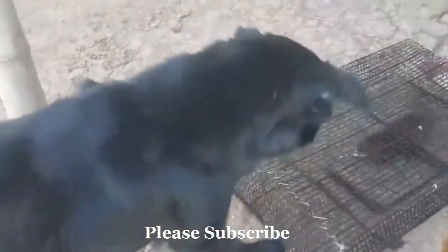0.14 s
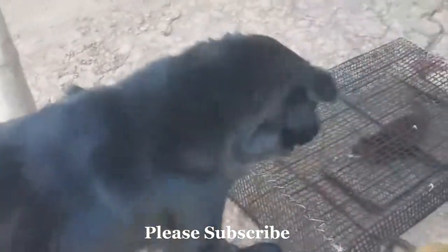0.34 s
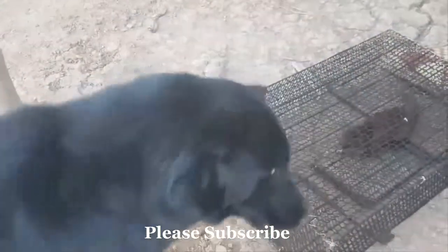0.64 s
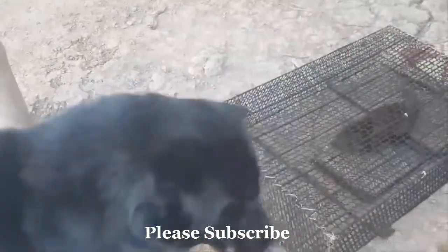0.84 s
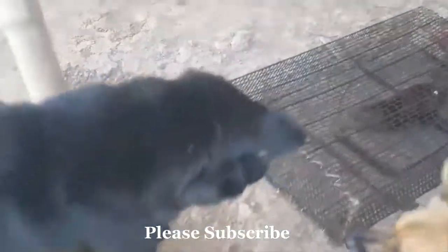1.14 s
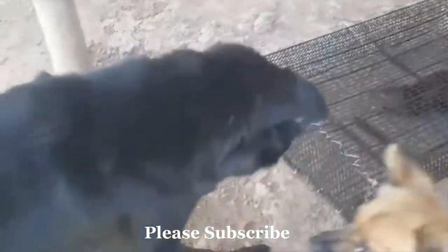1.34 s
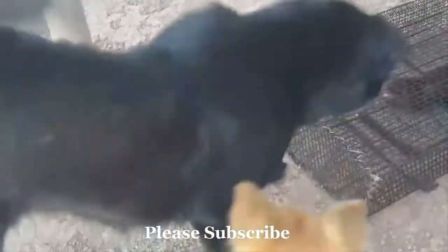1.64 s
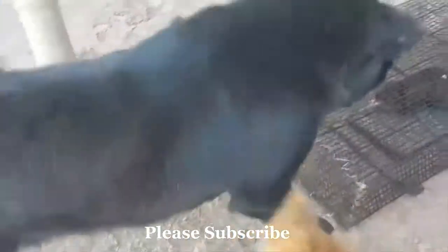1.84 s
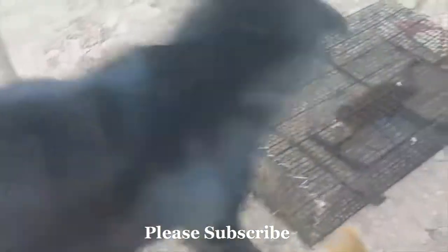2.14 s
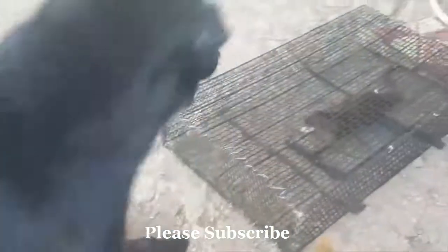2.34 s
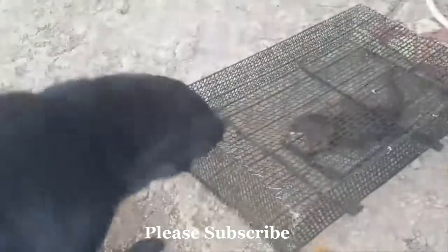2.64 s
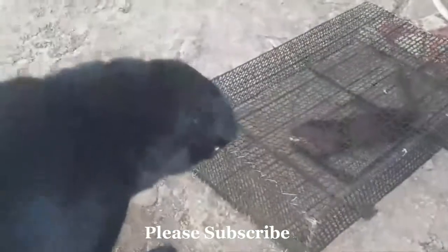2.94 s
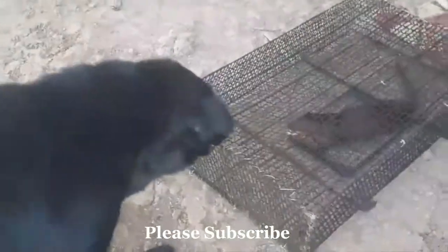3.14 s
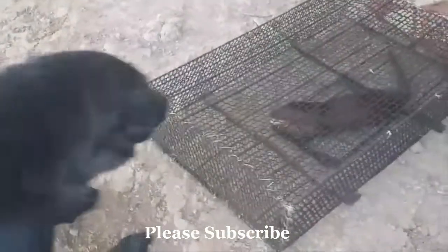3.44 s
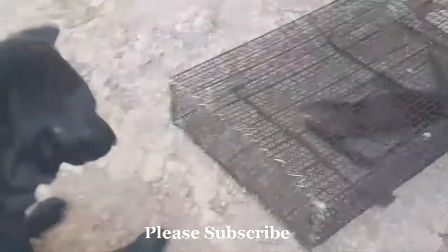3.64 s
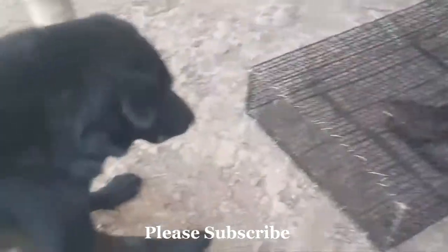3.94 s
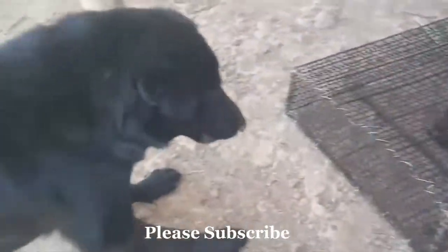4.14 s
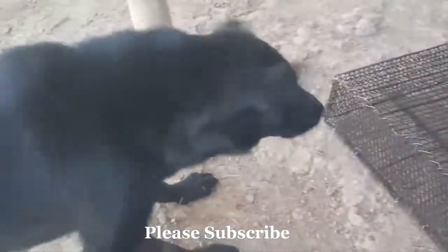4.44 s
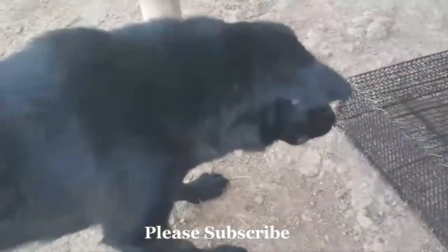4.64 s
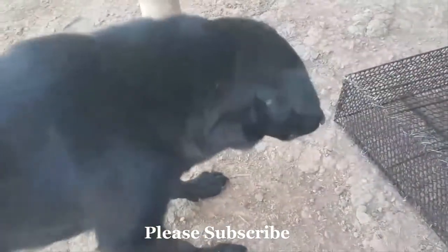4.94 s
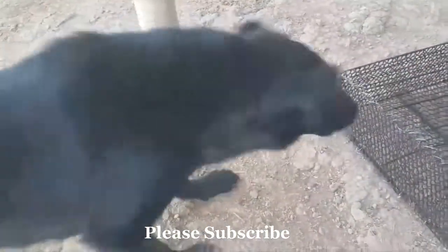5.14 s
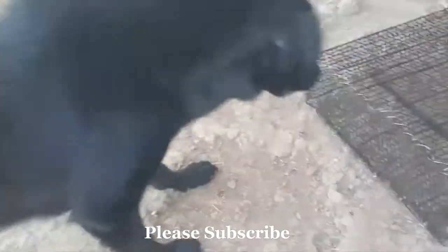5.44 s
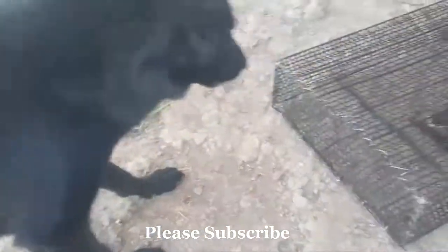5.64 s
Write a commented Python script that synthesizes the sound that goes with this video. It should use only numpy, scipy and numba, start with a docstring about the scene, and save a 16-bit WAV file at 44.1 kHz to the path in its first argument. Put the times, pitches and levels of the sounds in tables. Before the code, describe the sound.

Close, rough, overloading barks from a big dog in a hard yard, with low breathy growls, a few short whines and faint wind.

```python
"""A hard-floored yard with a wire cage: a large dog growls and barks close to a small stereo microphone.
A second dog whines and yelps beside it, over wind rumble, faint air noise and small ticks.
Barks and growls are uneven pulses and puffs of noise through resonances; whines are stacks of sine waves.
Decaying noise makes the reflections. Crackles at set times give the sound of an overloaded input."""
import sys
import numpy as np
from scipy import signal
from scipy.fft import rfft, irfft
from scipy.io import wavfile
from scipy.ndimage import uniform_filter1d, minimum_filter1d
from numba import njit

SR = 44100
rng = np.random.default_rng(int(sys.argv[2]) if len(sys.argv) > 2 else 0)


def log_audio(samples):
    """Write samples as a 16-bit WAV file to the path given in sys.argv[1]."""
    # one column per channel
    frames = np.atleast_2d(samples).T
    # limit to full scale, then quantise
    limited = np.clip(frames, -1, 1)
    pcm = np.round(limited * 32767).astype(np.int16)
    wavfile.write(sys.argv[1], SR, pcm)


N = 255735

# Barks (the first begins before the sound starts): start t/s, attack/s, voiced length/s,
# pitch at start f/Hz, at top f/Hz, at end f/Hz, throat level/dB, mouth level/dB, lips level/dB,
# rasp level/dB, release/(dB per s), tail below the voice level/dB
BARKS = [ (-0.17, .012, 0.15, 592, 680, 604.6, -16.5, -12.5, -26.5, -39, 657, 15.5),
         (0.451, 0.0064, 0.11, 596.1, 677.5, 660.2, -10, -17.5, -31, -33, 650, 9.5),
         (1.46, 0.016, 0.11, 681, 761.2, 639.4, -9.5, -12, -26.5, -32.5, 505, 18),
         (2.182, 0.014, 0.11, 561.4, 706.5, 666.1, -11.5, -19, -31, -37, 797.5, 22.5),
         (2.363, 0.031, 0.16, 585.9, 668.1, 541, -11.5, -14.5, -33, -36.5, 455, 27.5),
         (3.413, 0.0074, 0.12, 480, 701.3, 688.9, -14.5, -9.5, -24, -29.5, 654, 14),
         (4.338, .013, 0.13, 618.3, 715.4, 634, -10, -10, -26.5, -28.5, 653, 31),
         (5.06, 0.024, 0.13, 416.7, 797.5, 597.8, -20.5, -13, -23, -33, 702, 25), ]
# Jaw during each bark: t/s, mouth f/Hz, lips f/Hz, level moved from throat to mouth/dB
JAW = [
    [(0, 950, 1500, -2), (.1, 920, 1560, 2.5)],
    [(.458, 836, 1460, -1.5), (.48, 860, 1884, 4.5), (.51, 1100, 1760, -5), (.54, 1110, 1560, 2.5),
     (.565, 1030, 1660, 2), (.585, 910, 1640, -7), (.62, 994, 1550, 6)],
    [(1.47, 906, 1830, 6.5), (1.487, 1080, 1930, -3.5), (1.515, 1027, 1680, 1.5), (1.56, 940, 1775, 9),
     (1.585, 970, 1490, 2), (1.615, 1074, 1629, -7)],
    [(2.195, 1100, 1770, 4.5), (2.22, 836, 1420, -3.5), (2.25, 1086, 1470, 1.5), (2.28, 1060, 1440, -8),
     (2.3, 1130, 1710, 3)],
    [(2.385, 1060, 1564, -5.5), (2.42, 960, 1670, 2), (2.455, 1044, 1890, -6), (2.49, 900, 1530, 2),
     (2.52, 1026, 1590, -3), (2.54, 940, 1700, 6.5), (2.56, 1010, 1540, -1)],
    [(3.422, 1060, 1580, -4.5), (3.44, 1077, 1679, 7.5), (3.47, 975, 1663, -0.5), (3.5, 967, 1590, 1.5),
     (3.525, 1020, 1940, 0.5), (3.55, 1005, 1509, -8.5), (3.58, 924, 1665, 0)],
    [(4.35, 994, 1700, -3.5), (4.375, 841.7, 1735, 5), (4.4, 845, 1923, -9), (4.425, 936, 1800, 0),
     (4.455, 1043, 1740, -4), (4.48, 880, 1740, -2), (4.505, 983, 1714, 13)],
    [(5.075, 1092, 1772, -1.5), (5.09, 1176, 1802, -7), (5.102, 974, 1850, 2.5), (5.15, 912, 1694, 6),
     (5.168, 1254, 1820, -8), (5.2, 967, 1700, 6), (5.225, 1160, 1704, -5.5)],
]
# Resonances of the bark's rasp: f/Hz, width/Hz (before formant() widens it), relative level/dB
RASP = [(1310, 320, 12), (2160, 250, 13), (2904, 420, 3.5), (3950, 380, -21), (4626, 760, -10.5),
        (6900, 670, -22), (12500, 4800, -30)]
# Growl and rough breath, one list per breath: t/s, throat and mouth level/dB, chest level/dB, treble level/dB
GROWL = [
    [(0.12, -52.5, -64, -65), (0.162, -56.5, -60, -57.5), (0.254, -46.5, -44, -56.5),
     (0.292, -46, -76, -55), (0.322, -45.5, -53.5, -52.5), (0.372, -41, -77, -54),
     (0.41, -43.5, -55.5, -64)],
    [(0.72, -63.5, -85, -81), (0.77, -69, -101, -84), (0.936, -55, -50, -60), (1.004, -58, -76, -66.5),
     (1.068, -54.5, -55.5, -71), (1.372, -30.5, -39, -43.5), (1.445, -69, -42.5, -61)],
    [(1.69, -53, -54.5, -60.5), (1.77, -55, -45, -58), (1.806, -42.5, -41.5, -54.5),
     (1.986, -47.5, -40.5, -57.5), (1.994, -44, -34.5, -53), (2.07, -41, -42.5, -55.5),
     (2.175, -47, -44, -42.5)],
    [(2.75, -62, -67, -72.5), (2.776, -50.5, -44, -58.5), (2.89, -39, -35.5, -54.5),
     (3.076, -35.5, -35, -51.5), (3.106, -46, -37.5, -57), (3.372, -37, -33.5, -40.5),
     (3.402, -60, -44, -51)],
    [(3.72, -85.5, -61, -82.5), (3.77, -86, -75, -82), (3.784, -101.5, -85, -81), (3.824, -74, -62, -87),
     (3.878, -67.5, -61, -79), (3.924, -63.5, -50.5, -59), (3.955, -68, -67.5, -82)],
    [(3.985, -58, -59, -74), (4.013, -65, -61.5, -81.5), (4.167, -61.5, -65, -59.5),
     (4.251, -47.5, -44, -55), (4.275, -45.5, -54.5, -56), (4.309, -74, -57, -68),
     (4.325, -58.5, -53, -75.5)],
    [(4.655, -59, -63.5, -84), (4.679, -47, -49, -64), (4.777, -44.5, -40, -59.5),
     (4.877, -57, -59.5, -55.5), (5.009, -53, -66.5, -56.5), (5.029, -72.5, -74, -65.5),
     (5.04, -76.5, -44.5, -66)],
    [(5.36, -60, -86, -89.5), (5.38, -47, -47.5, -67), (5.43, -47, -42, -66), (5.5, -55, -51.5, -64),
     (5.586, -51.5, -47.5, -61.5), (5.73, -55.5, -50, -63.5), (5.79, -43, -47, -54)],
]
# Colour of each breath: mouth against throat level/dB, teeth against treble level/dB,
# hiss against treble level/dB, stretch of the teeth resonances (a factor)
BREATHS = [(-6.5, -4, -13, 0.93), (-12, -4, -11.5, 0.93), (-9, -7, -11.5, 0.93), (-1, -6.5, -11.5, 0.957),
           (-5, -2.5, -11.5, 0.64), (-7, -4, -11, 0.9), (-6, -3.5, -10, 0.9), (-4, -1.5, -7.5, 0.915)]
# Resonances of the growl, before the jaw shifts them:
# f/Hz, width/Hz (before formant() widens it), relative level/dB
CHEST = [(126, 37, 8.5), (214, 139, 3)]
THROAT = [(690, 140, 0), (950, 110, -6)]
MOUTH = [(1330, 190, 0), (1620, 150, -10)]
TEETH = [(2220, 190, 0), (2560, 220, -2)]
HISS = [(3090, 600, 20.6), (4570, 1600, 3.1), (6450, 1300, 3.5), (12400, 1900, 0.5)]
# Air moving over the microphone ports: t/s, level/dB
WIND = [(0.0, -69), (0.35, -54.5), (0.76, -68.5), (1.08, -68), (1.31, -56), (1.6, -63), (2.07, -62.5),
        (2.7, -61.5), (3.2, -52), (3.33, -51.5), (3.65, -67.5), (3.91, -63), (4.34, -63.5), (4.52, -68),
        (4.73, -81), (4.89, -57), (5.25, -76.5), (5.8, -63)]
# Tone of the yard's background noise: f/Hz, relative level/dB (per Hz)
AIR_TONE = [(18, -39), (30, -14), (109, 9.5), (350, -7.5), (955, -7.5), (1580, -16), (2150, -12),
            (9000, -42.5), (11700, -78.5), (19800, -120)]
# Second dog: loudest t/s, rise/s, fall/s, pitch at start f/Hz, just after the loudest f/Hz, at end f/Hz,
# peak level/dB (rms), partial 2 against 1 level/dB, partial 3 against 1 level/dB, hoarseness/(0-1)
WHINES = [ (0.29, .04, 0.057, 382.5, 438, 461, -39.5, -19.5, -10.5, .1),
          (2.04, 0.026, 0.083, 521, 500.5, 496, -34.5, -10.5, -22, .1),
          (2.125, 0.056, .16, 668, 541, 567, -34, -13.5, -32, .1),
          (2.625, 0.028, 0.04, 539.4, 607, 586, -17, 0.5, -17.5, .25), ]
# Small mouth and paw noises: t/s, starting level of the ring/dB, f/Hz
TICKS = [(0.416, -43.5, 710), (0.828, -47, 676), (2.137, -33, 584), (3.967, -51.5, 799.8)]
# Overload crackles: t/s, level/dB (scales the whole bump), left minus right level/dB, half-length/ms
CRACKLES = [(0.497, -18.5, -17, 0.39), (0.5, -16, 11.5, 0.075), (0.5043, -20, 18, 0.39),
            (1.4949, -35, -1, 0.11), (1.5283, -35, -4, 0.15), (3.4714, -19.5, -2, 0.13),
            (3.4917, -9.5, 1, 0.14), (3.4943, -10.5, -6, 0.28), (3.5016, -16.5, 3.5, 0.13),
            (4.374, -22, 12.5, 0.13), (4.403, -20, 14, 0.34), (4.4208, 6, -8, 0.093),
            (4.4291, -5, 7.5, 0.11), (4.4375, 3, 13, 0.16), (4.4403, 7, 0, 0.12), (4.4436, -11, -27, 0.076),
            (4.4564, -25, 4.5, 0.15)]

# Barks
CLEAR_S, ROUGHNESS = .018, .7   # roughness (0-1) builds up around this time
SOFT_CLOSURE_HZ = (320, 950)   # the open mouth sheds little bass, the folds close softly
ATTACK_DB, BRIGHT_S, BRIGHT_LAG_DB = 23.5, 0.01, 4.5   # rise of the attack; rasp and lips come up later
RISE_S, SAG_SHARE = .03, 0.65   # pitch nears its top in this time and sags after this share of the length
TAIL_DB_PER_S = 232.5   # the voice stops fast, a faint tail lingers
FLUTTER_DB, JAW_WANDER = 3.5, 0.045   # each resonance swells and drifts on its own
LIPS_FOLLOW = .6   # share of the jaw's level shift at the lips
RASP_ARCH_DB, RASP_FADE = 8.5, 0.53   # rasp is strongest mid-bark and fades at this share of the voice's rate
MOUTH_FADE = 0.11   # the mouth closes: its ring dies this share faster than the throat
# Growl and wind
GROWL_PULSES_PER_S = 105   # before the random unevenness
CHEST_ON_PORTS_DB = -18.5   # the growl also blows on the microphone ports: against the chest level
RUMBLE_HZ = 102   # top of the wind rumble
PUFF_DB, PUFF_S = -27, 0.015   # each bark puffs air on the ports: against the mouth level, decay
AIR_DB = -60
# Whines
WHINE_WAVER, WHINE_FLUTTER_DB = .012, 2.5
WHINE_EDGE_DB, WHINE_ONSET = 15, 1.6   # level lost after one rise or fall time; abruptness of the start
PARTIAL_4_DB, PARTIAL_5_DB = -3.5, -11   # against partial 3
OVERTONE_FADE = 0.21   # each higher partial dies this share faster
# Reflections: time to fall 60 dB, level before the bass is cut, bass cut
NEAR_T60_S, NEAR_DB, NEAR_LOW_HZ = 0.12, 3.5, 2000   # ground and cage, which scatter mostly treble
YARD_T60_S, YARD_DB, YARD_LOW_HZ = 0.18, -8.5, 363
NEAR_UNSHARED, YARD_UNSHARED = 0.85, 0.41   # how strongly the two sides differ
# Microphone
CRACKLE_HZ, CRACKLE_PUSH = 5004, 0.79   # wave inside a crackle; one-sided push added to it
PEAK_LIMIT, CUTOFF_HZ = .93, 15600


def from_db(db):
    """dB to gain."""
    return 10 ** (np.asarray(db) / 20)


def in_time(tables, column):
    """One column of several tables, joined by straight lines between its points."""
    rows = np.concatenate(tables)
    return np.interp(np.arange(N) / SR, rows[:, 0], rows[:, column])


def evened(x, window_s):
    """Divides out the slow level, so that the local rms is about 1."""
    power = uniform_filter1d(x ** 2, size=int(window_s * SR)).clip(0)
    return x / np.sqrt(power + 1e-12)


def wander(length):
    """Noise averaged over some samples; spread 1."""
    return uniform_filter1d(rng.standard_normal(N), size=length) * np.sqrt(length)


def slow(length):
    """Smoother random drift; spread about 1."""
    return uniform_filter1d(wander(length=length), size=length // 2)


@njit
def resonate(x, hz, r, step):
    """Two-pole resonance whose centre may move every sample."""
    y = np.zeros(len(x))
    for i in range(2, len(x)):
        push = (1 - r * r) / 2 * (x[i] - x[i - 2])
        y[i] = push + 2 * r * np.cos(step * hz[i]) * y[i - 1] - r * r * y[i - 2]
    return y


def formant(x, hz, width_hz):
    """A resonance applied twice keeps the valleys beside it dark."""
    r = np.exp(-np.pi * 1.5 * width_hz / SR)   # each pass is 1.5 times as wide
    centre = hz + np.zeros(N)
    step = 2 * np.pi / SR
    return resonate(resonate(x, centre, r, step), centre, r, step)


def formants(x, modes, shift=1):
    """Side-by-side resonances with alternating signs; shift scales their frequencies."""
    out = np.zeros(N)
    for k, (hz, width_hz, db) in enumerate(modes):
        out += (-1) ** k * from_db(db) * formant(x, hz * shift, width_hz)
    return out


def folds(per_s, rough, jitter, shimmer_db, breath, doubling_db, puff_decay):
    """Vocal-fold closures: uneven in time and strength as roughness grows, each with a puff of noise."""
    wobble = wander(length=150)
    phase = np.cumsum(per_s * np.exp(jitter * rough * wobble)) / SR
    cycle = phase.astype(int)
    weak = doubling_db * (cycle % 2)   # strong and weak closures in turn halve the pitch
    strength = from_db(rough * (shimmer_db * rng.standard_normal(N)[cycle] - weak))
    closure = np.diff(cycle, prepend=0) * np.sqrt(SR / per_s)
    puff = np.exp(-puff_decay * (phase - cycle)) * rng.standard_normal(N)
    return strength * (closure + breath * rough * puff)


def barks():
    """A throat resonance follows the pitch; the voice turns rough, and mouth, lips and rasp colour it."""
    t = np.arange(N) / SR
    rows = np.array(BARKS)
    current = np.searchsorted(rows[:, 0], t, side="right").clip(1) - 1
    (start, attack, length, first_hz, top_hz, last_hz, throat_db, mouth_db, lips_db,
     rasp_db, release_db, tail_db) = rows[current].T
    since = t - start
    after = (since - length).clip(0)

    sag = ((since / length - SAG_SHARE) / (1 - SAG_SHARE)).clip(0, 1.5)
    climb_hz = (top_hz - first_hz) * np.exp(-since / RISE_S)
    pitch_hz = top_hz - climb_hz - (top_hz - last_hz) * sag

    fade_db = np.minimum(release_db * after, tail_db + TAIL_DB_PER_S * after)
    effort_db = -ATTACK_DB * (1 - since / attack).clip(0) - fade_db
    late_db = effort_db - BRIGHT_LAG_DB * np.exp(-since / BRIGHT_S)
    arch_db = -RASP_ARCH_DB * (2 * (since / length).clip(0, 1) - 1) ** 2
    mouth_hz, lips_hz, shift_db = (in_time(JAW, column=k) for k in range(1, 4))

    rough = ROUGHNESS * np.clip(since / CLEAR_S - .5, .3, 1)
    source = folds(pitch_hz, rough, jitter=.22, shimmer_db=6, breath=1.0, doubling_db=7, puff_decay=0.87)
    soft = signal.sosfilt(signal.butter(2, SOFT_CLOSURE_HZ, "band", fs=SR, output="sos"), source)

    slower_fade_db = (1 - RASP_FADE) * fade_db.clip(0, 70)   # gives back part of the fade
    out = evened(formants(source, RASP), 0.11) * from_db(rasp_db + late_db + arch_db + slower_fade_db)
    throat_level_db = throat_db + effort_db - shift_db
    mouth_level_db = mouth_db + effort_db + shift_db - MOUTH_FADE * fade_db
    lips_level_db = lips_db + late_db + LIPS_FOLLOW * shift_db
    parts = ((pitch_hz, throat_level_db, 170), (mouth_hz, mouth_level_db, 135), (lips_hz, lips_level_db, 165))
    for hz, level_db, width_hz in parts:
        ring = formant(soft, hz * np.exp(JAW_WANDER * slow(length=1200)), width_hz)
        flutter_db = FLUTTER_DB * rough * slow(length=600)
        out += evened(ring, 0.014) * from_db(uniform_filter1d(level_db, size=60) + flutter_db)
    return out


def growl():
    """Uneven throat pulses rattle the chest; the upper parts are mostly breath, and the jaw keeps shifting."""
    rattle = folds(GROWL_PULSES_PER_S, 1.0, jitter=.3, shimmer_db=-1.5, breath=3.5, doubling_db=-0.5,
                   puff_decay=0.28)
    breath = folds(GROWL_PULSES_PER_S, 1, jitter=.3, shimmer_db=2, breath=6, doubling_db=0, puff_decay=.9)
    jaw = np.exp(.025 * wander(length=9000))
    level_db, chest_db, treble_db = (in_time(GROWL, column=k) for k in range(1, 4))
    starts = [round(table[0][0] * SR) for table in GROWL]
    current = np.searchsorted(starts, np.arange(N)).clip(1) - 1
    open_db, teeth_db, hiss_db, stretch = np.array(BREATHS)[current].T
    throat_db = level_db - 10 * np.log10(1 + 10 ** (open_db / 10))   # throat and mouth share the level
    parts = ((rattle, CHEST, jaw, chest_db),
             (breath, THROAT, jaw, throat_db),
             (breath, MOUTH, jaw, throat_db + open_db),
             (breath, TEETH, jaw * stretch, treble_db + teeth_db),
             (breath, HISS, jaw, treble_db + hiss_db))
    return sum(evened(formants(source, modes, shift), 0.28) * from_db(db)
               for source, modes, shift, db in parts)


def rumble():
    """Wind on the ports: lumpy low noise, its own on each side, with growl breath and a puff at each bark."""
    t = np.arange(N) / SR
    low_band = signal.butter(2, [40, RUMBLE_HZ], "band", fs=SR, output="sos")
    noise = signal.sosfilt(low_band, rng.standard_normal((2, N)))
    puffs = np.zeros(N)
    for bark in BARKS:
        start, mouth_db = bark[0], bark[7]
        puffs += from_db(mouth_db + PUFF_DB) * (t > start) * np.exp(-np.abs(t - start) / PUFF_S)
    wind = from_db(in_time([WIND], column=1))
    growl_breath = from_db(in_time(GROWL, column=2) + CHEST_ON_PORTS_DB)
    return noise / noise.std() * (wind + growl_breath + uniform_filter1d(puffs, size=300))


def air():
    """Faint background noise with a set tone, partly shared by both sides."""
    hz = np.arange(N // 2 + 1) * SR / N + 1
    tone = np.array(AIR_TONE)
    shape = from_db(np.interp(np.log(hz), np.log(tone[:, 0]), tone[:, 1]))
    white = rng.standard_normal((3, N))
    noise = irfft(rfft(white[0] + .5 * white[1:]) * shape, N)
    return from_db(AIR_DB) * noise / noise.std()


def scatter(t60_s, level_db, low_hz, unshared):
    """Dense decaying reflections as fading noise, partly different on each side."""
    t = np.arange(SR // 2) / SR
    shared, side = rng.standard_normal((2, len(t))) * from_db(-60 * t / t60_s)
    noise = (shared + unshared * side * [[1], [-1]]) / np.sqrt(np.sum(shared ** 2))
    bass_cut = signal.butter(2, low_hz, "high", fs=SR, output="sos")
    return from_db(level_db) * signal.sosfilt(bass_cut, noise)


def yard(x):
    """Direct sound plus reflections from near things and from the walls."""
    near = scatter(NEAR_T60_S, NEAR_DB, NEAR_LOW_HZ, NEAR_UNSHARED)
    walls = scatter(YARD_T60_S, YARD_DB, YARD_LOW_HZ, YARD_UNSHARED)
    return x + signal.fftconvolve(x[None], near + walls, axes=1)[:, :N]


def whines():
    """Calls of five partials (sine waves at whole multiples of the pitch), unsteady in pitch and level."""
    out, t = np.zeros(N), np.arange(N) / SR
    waver = np.exp(WHINE_WAVER * wander(length=250))
    for s, rise, fall, first_hz, top_hz, last_hz, peak_db, second_db, third_db, hoarse in WHINES:
        pitch_hz = np.interp(t, [s - rise, s + fall / 2, s + fall], [first_hz, top_hz, last_hz]) * waver
        phase = 2 * np.pi * np.cumsum(pitch_hz) / SR
        # clip only guards the branch that is not used
        edge = np.where(t < s, ((s - t).clip(0) / rise) ** WHINE_ONSET, (t - s) / fall)
        level_db = peak_db - WHINE_EDGE_DB * edge
        partials_db = [0, second_db, third_db, third_db + PARTIAL_4_DB, third_db + PARTIAL_5_DB]
        for k, db in enumerate(partials_db):
            flutter_db = WHINE_FLUTTER_DB * uniform_filter1d(wander(length=300), size=100)
            extra_fade_db = OVERTONE_FADE * k * (peak_db - level_db) * (t > s)
            gain = np.sqrt(2) * from_db(level_db + db + flutter_db - extra_fade_db)
            out += gain * (1 + hoarse * slow(length=70)) * np.sin((k + 1) * phase)
    return out


def ticks():
    """Mouth and paw noises: short dull noise bursts with a damped ring."""
    out, t = np.zeros(N), np.arange(1200) / SR
    bursts = rng.standard_normal((len(TICKS), len(t)))
    dull = signal.sosfilt(signal.butter(3, 3000, fs=SR, output="sos"), bursts)
    for (s, ring_db, hz), burst in zip(TICKS, dull):
        start = round(s * SR)
        ring = np.sin(2 * np.pi * hz * t)
        out[start:start + len(t)] += from_db(ring_db) * np.exp(-t / .005) * (ring + 1.5 * burst)
    return out


def crackles():
    """Split-second jumps of the signal, each with its own balance between the sides."""
    out, reach = np.zeros((2, N)), np.arange(-60, 61)
    t = reach / SR
    for s, level_db, pan_db, length_ms in CRACKLES:
        bump = np.exp(-(t / (length_ms / 1000)) ** 2)
        jump = bump * (np.cos(2 * np.pi * CRACKLE_HZ * t) + CRACKLE_PUSH)
        sides_db = [[level_db + pan_db / 2], [level_db - pan_db / 2]]
        out[:, round(s * SR) + reach] += from_db(sides_db) * jump
    return out


def scene():
    """Both dogs in the yard, with wind and air noise."""
    return yard(barks() + growl() + whines() + ticks()) + rumble() + air()


def record(dry):
    """A look-ahead limiter holds the peaks, crackles jump against the wave, the top is cut."""
    needed = np.minimum(1, PEAK_LIMIT / (np.abs(dry).max(axis=0) + 1e-9))
    level = dry * uniform_filter1d(minimum_filter1d(needed, size=300), size=300)
    against = -np.sign(uniform_filter1d(level, size=15, axis=1))
    level = np.clip(level + crackles() * against, -1, 1)
    return signal.sosfilt(signal.cheby2(12, 60, CUTOFF_HZ, fs=SR, output="sos"), level)


dry = scene()
out = record(dry)
log_audio(out)
```